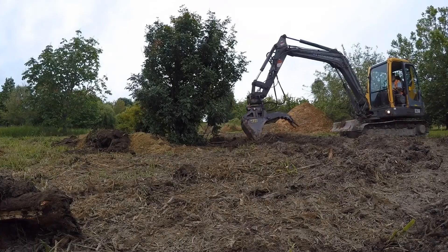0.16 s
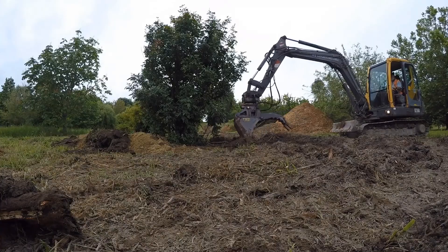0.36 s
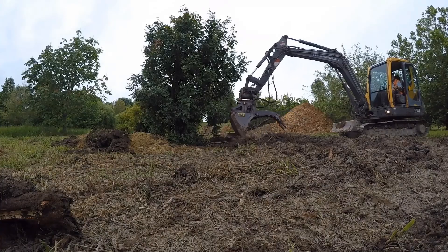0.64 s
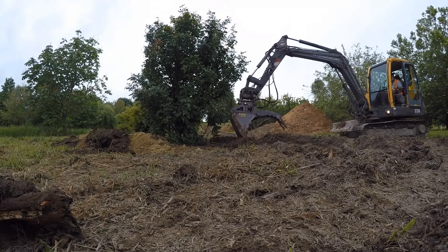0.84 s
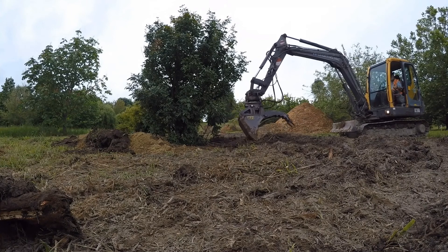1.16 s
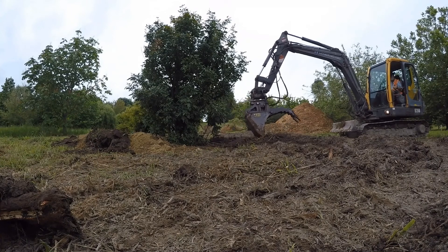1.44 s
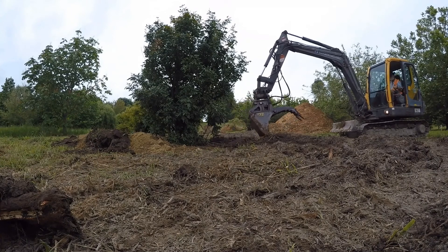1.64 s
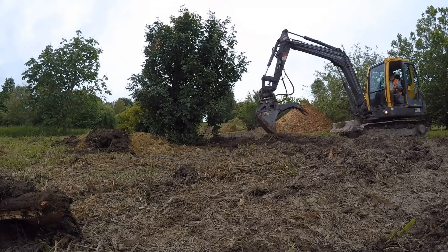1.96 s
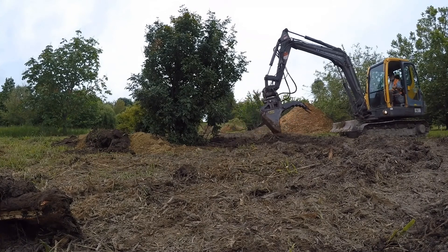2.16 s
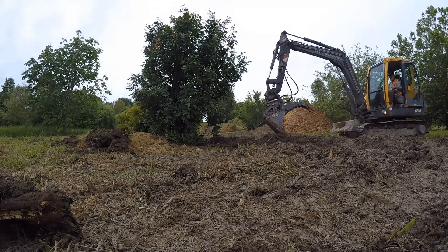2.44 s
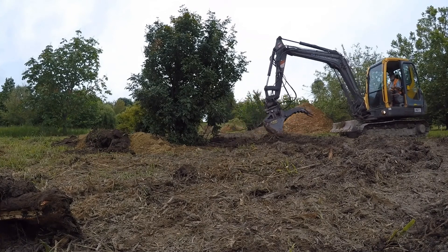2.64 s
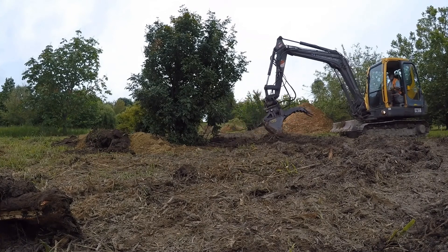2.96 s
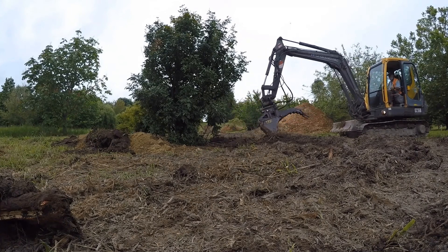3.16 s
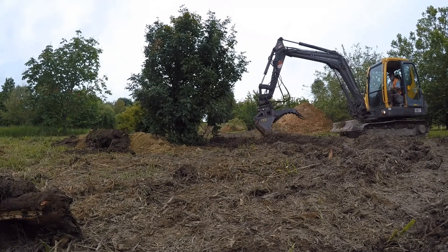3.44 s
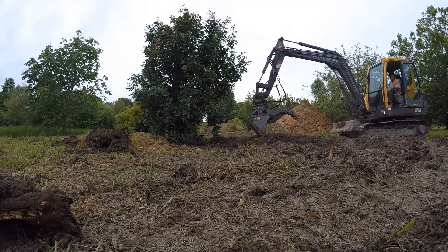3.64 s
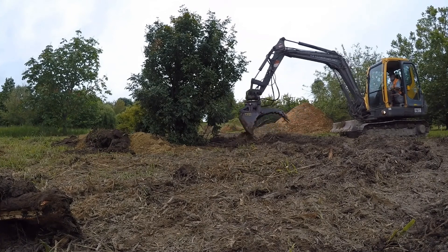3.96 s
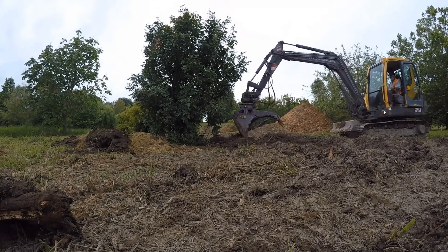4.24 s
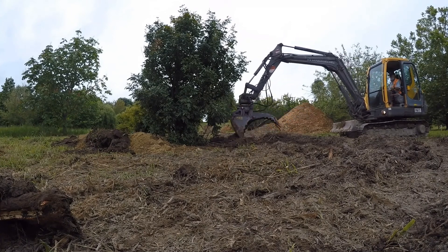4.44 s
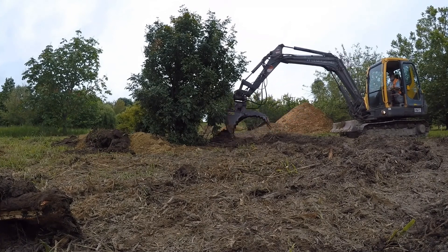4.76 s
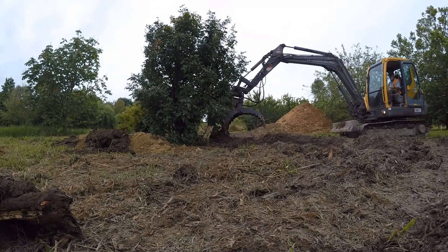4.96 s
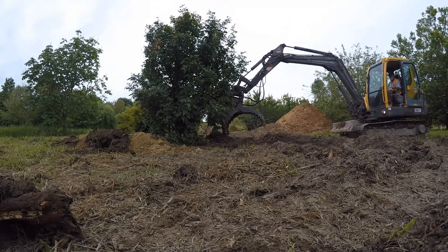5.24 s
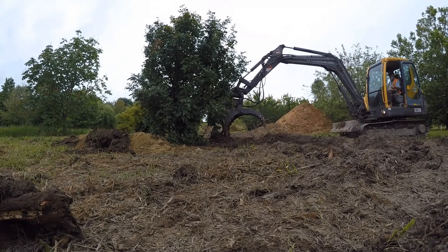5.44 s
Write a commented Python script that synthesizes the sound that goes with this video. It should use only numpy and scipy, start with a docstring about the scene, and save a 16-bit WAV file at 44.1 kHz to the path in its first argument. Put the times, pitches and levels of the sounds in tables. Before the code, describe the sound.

Low, booming four-cylinder diesel clatter surges slightly under load outdoors, while an excavator's bucket and linkage thud and clank a few times.

```python
"""The four-cylinder diesel of a small digger booms in a field, off to the right: sine waves at multiples of
its firing rate, with short rings for the knocks and noise that throbs with the firings for the clatter.
A low wavering sine hums and beats against the boom. One strong engine knock, then the thuds of the bucket
and the clanks of its linkage, are struck metal that rings briefly. Noise makes the rumble, the treble hiss
and a very short rough opening; sines make thin lines of pump and gears and a faint, fast-pulsing whine."""
import sys
import numpy as np
from scipy import signal
from scipy.fft import rfft, irfft, next_fast_len
from scipy.io import wavfile
from scipy.ndimage import uniform_filter1d

SR = 44100
rng = np.random.default_rng(int(sys.argv[2]) if len(sys.argv) > 2 else 0)


def wrap_up_sound(samples):
    """Save the sound to the file named by the first command line argument, as 16-bit audio."""
    columns = np.atleast_2d(samples).T
    # keep every value between -1 and 1, then stretch to whole-number steps
    tamed = np.clip(columns, -1, 1)
    steps = np.round(tamed * 32767).astype(np.int16)
    wavfile.write(sys.argv[1], SR, steps)


N = 246519   # length in samples
# frequencies in Hz at which filters are described; the tiny shift avoids log(0)
HZ = np.fft.rfftfreq(next_fast_len(N + 8192, real=True) // 2 * 2, 1 / SR) + 1e-3

# How the two channels hear a distant source. Each row: frequency in Hz, left minus right in dB,
# likeness of the two channels (0 to 1).
CHANNELS = [(157, -0.8, 0.52), (236, -3.5, 0), (407, 0.5, 0.62), (523, -2.5, 0.95), (730, -7.5, 0.95),
            (1337, 3, 0.96), (1596, 9, 0.76), (2490, -6, 0.86), (3060, 0.5, 0.7), (4900, -7.5, 0.58),
            (6500, 0, 0), (10100, -3.5, 0.17), (11700, -0.5, 0.13), (14300, 0, 0)]
# Phase between the channels. Each row: frequency in Hz, how far the left leads in radians.
LEFT_LEAD = [(0, 0), (260, -0.3), (860, -3.7), (1290, -3.5), (2150, -5.2), (2670, -7.3), (3010, -7.8),
             (3270, -5.1), (3790, -3.8), (4310, -4.7), (5000, -2.5), (5680, -2.4), (8610, -6.1),
             (14500, -5.7)]
# Turning of the cab. Each row: time in seconds, share of the turn (0 to 1).
SWING = [(0, 0), (2.3, 0.5), (3.0, 0.6), (3.3, 1), (4.8, 1), (5.59, 0.6)]

# Tone colour of the rough opening. Each row: frequency in Hz, relative level in dB per Hz.
OPENING_COLOUR = [(59, -17), (100, 14), (179, -10), (468, -31), (670, -21), (855, -45), (2030, -33),
                  (2550, -42), (9000, -58), (11700, -83), (19800, -120)]
# Tone colour of the rumble. Each row: frequency in Hz, relative level in dB per Hz.
RUMBLE_COLOUR = [(15, -5), (30, 17), (65, 11.5), (80, -63), (115, 5.5), (170, 5), (260, -7), (400, -17),
                 (900, -80)]
# Low wavering hum. Each row: time in seconds, frequency in Hz, level in dB.
HUM = [(0.05, 38.58, -37.5), (0.3, 40.93, -32.5), (0.42, 34.41, -42.0), (0.55, 44.19, -25.5),
       (0.8, 38.36, -40.0), (1.05, 41.94, -19.5), (1.17, 44.87, -33.0), (1.3, 38.17, -29.0),
       (1.42, 38.75, -53.5), (2.05, 41.15, -45.5), (2.67, 39.2, -41.5), (3.3, 39.01, -28.0),
       (3.42, 41.94, -32.0), (3.55, 38.02, -27.5), (4.05, 41.93, -40.0), (5.55, 36.55, -43.0)]
# Thin lines of pump and gears. Each row: frequency in quarters of the firing rate,
# level in dB before the left-right offset, delay in firings.
GEAR_LINES = [(30, -70, 0), (40, -73, 0), (46, -66.5, .62), (50, -68, .62), (60, -67.5, .45),
              (68, -74, .45), (76, -71, .45)]

# Hollow thuds of the bucket; the first, at 1.409 s, is a strong engine knock. Each row: time in seconds,
# base level in dB of the body rings, of the rim rings.
THUDS = [(1.409, -34.5, -45), (2.443, -39, -40), (2.775, -43, -54), (2.925, -34, -43), (3.042, -55, -34),
         (3.05, -26, -33), (3.062, -42, -30), (3.092, -27, -55), (3.118, -30, -46), (3.127, -47, -32),
         (4.224, -52, -38.5), (5.2705, -32, -30.5), (5.2767, -25.5, -61), (5.297, -43, -33)]
# Rings of the bucket body. Each row: frequency in Hz, relative level in dB, time to fall 60 dB in seconds.
BUCKET = [(215, -9, .04), (287, -2, .09), (312, -4, .07), (335, -6, .06)]
# Rings of the bucket rim. Each row: frequency in Hz, relative level in dB, time to fall 60 dB in seconds.
RIM = [(360, -3, .06), (390, -1, .06), (440, -3, .05), (485, -10, .04), (770, -14, .03)]
# Clanks in the bucket linkage. Each row: time in seconds, base level in dB of the link, of the pin,
# of the plate, of the bright tick.
CLANKS = [(0.955, -45.5, -45, -60, -69), (1.864, -56, -37.5, -60, -63), (2.4599, -39, -58, -49, -41),
          (2.465, -40.5, -56, -46, -56), (3.0349, -34.5, -43, -48, -53), (3.0452, -43, -37, -43, -36.5),
          (3.0572, -34, -43, -39, -62), (3.0645, -40, -54, -50, -62), (3.076, -38, -41, -52, -69),
          (3.109, -40, -50, -59, -66), (3.128, -34, -46, -33, -53), (3.1372, -33, -46, -37, -44),
          (3.151, -41, -48, -52, -60), (3.17, -46, -54, -44, -60), (5.269, -35.5, -49, -58, -69),
          (5.278, -46, -52, -58, -63), (5.2971, -29.5, -45, -34, -52), (5.304, -40, -50, -49, -51),
          (5.312, -46, -50, -49, -58), (5.329, -44, -57, -55, -62), (5.346, -42, -43.5, -52, -66)]
# Rings of the link. Each row: frequency in Hz, relative level in dB, time to fall 60 dB in seconds.
LINK = [(2270, -6., .02), (2390, -4., .024), (2510, -5., .026), (2640, -8., .02)]
# Rings of the pin. Each row: frequency in Hz, relative level in dB, time to fall 60 dB in seconds.
PIN = [(1600, 0, 0.022), (1690, -2, 0.022), (1850, -5, 0.02), (2080, -6, 0.02)]
# Rings of the plate. Each row: frequency in Hz, relative level in dB, time to fall 60 dB in seconds.
PLATE = [(2870, -5., .02), (3120, -3., .016), (3350, -7., .016)]
# Rings of the bright tick. Each row: frequency in Hz, relative level in dB, time to fall 60 dB in seconds.
TICK = [(4300, -4., .008), (4850, 1., .01), (5500, -3., .008), (6100, -2., .009), (6600, -3., .008)]

# Tone colour of the clatter. Each row: frequency in Hz, relative level in dB per Hz.
CLATTER_COLOUR = [(160, -66.5), (250, -72.5), (400, -83.5), (600, -80.5), (900, -79.5), (1200, -79),
                  (1600, -86), (2500, -87), (3300, -94), (4600, -96.5), (6000, -97.5), (9000, -99),
                  (11000, -104), (14000, -113)]
# Resonances of engine block and hood. Each row: frequency in Hz, width in Hz, lift in dB.
BLOCK = [(733, 160, 4), (890, 120, 4), (1480, 26, 8), (1688, 56, 8), (1860, 47, 6.5), (2030, 54, 6.5),
         (2350, 80, 3.5), (2440, 49, -1.5), (2570, 57, 8), (4720, 160, 7)]
# Strength of the low clatter bursts, one value in dB for each of the four cylinders in turn.
CYLINDERS_DB = np.array([-6, 7, 1, 0])
# What each ignition sets ringing. Each row: frequency in Hz, time to fall 60 dB in seconds, delay in firings,
# gain in dB at full swing, then the base level in dB for each of the four cylinders.
IGNITION = [(710, .025, .44, -4, -62, -45, -53, -54), (830, .022, .44, -5, -60, -41, -50, -51),
            (900, .022, .46, -5, -60, -43, -52, -53), (1670, .03, .22, -6, -49, -50, -42, -46),
            (1860, .025, .42, 6, -53, -57, -56, -55), (2280, .02, .23, 1, -48, -46, -49, -46),
            (2600, .022, .24, -1, -47, -46, -45, -46), (2450, .018, .45, -3, -46, -47, -46, -49),
            (3020, .011, .27, 8, -49, -50, -59, -53)]
# Speed and boom of the engine. Each row: time in seconds, firings per second, then the level in dB
# of firing orders 1, 2, 3, 5 and 6.
ENGINE = [(0.05, 44.81, -23.5, -26.0, -38.0, -47.5, -56), (0.42, 45.81, -25.0, -25.5, -36.0, -53.0, -66),
          (0.8, 48.77, -28.0, -32.5, -39.5, -60.5, -62), (1.05, 46.02, -29.5, -27.5, -34.0, -59.5, -54),
          (1.3, 46.65, -25.0, -28.0, -34.5, -68.0, -55), (1.92, 46.83, -25.5, -31.0, -38.0, -57.0, -63),
          (2.3, 47.6, -28.0, -34.0, -49.5, -54.0, -55), (2.55, 48.6, -30.5, -41.5, -50.5, -56.0, -54),
          (2.8, 49.25, -35.5, -62.0, -43.5, -54.0, -62), (3.05, 46.66, -37.0, -43.0, -39.0, -50.0, -59),
          (3.42, 45.08, -30.0, -33.0, -36.5, -44.5, -58), (3.92, 45.84, -25.5, -31.0, -33.0, -56.5, -52),
          (4.3, 48.0, -27.5, -35.5, -35.0, -52.5, -58), (4.55, 45.35, -26.5, -29.5, -37.5, -53.0, -69),
          (4.92, 45.97, -24.5, -31.0, -45.0, -64.5, -54), (5.05, 47.5, -25.5, -34.0, -54.5, -59.5, -53),
          (5.3, 49.09, -30.5, -48.5, -43.5, -56.0, -56), (5.55, 47.69, -32.0, -41.0, -36.5, -54.5, -59)]
# Multiples of the firing rate, in the order of the level columns of ENGINE.
FIRING_ORDERS = [1, 2, 3, 5, 6]
# Weak lines at order 4 and between the orders, as cylinders differ a little. Each row: frequency in
# quarters of the firing rate, level in dB while order 2 is at -30 dB.
WEAK_LINES = [(2, -37), (5, -49), (6, -47), (10, -48.5), (16, -57)]

OPENING_DB, OPENING_S, OPENING_END_S = -15.5, .037, .003   # level, end time, length of the fade-out
WHINE_DB, WHINE_PER_S = -68.5, 59.94   # level before the left-right offset, pulses per second
WHINE_HZ, WHINE_SPREAD_HZ = 8560, 45   # middle pitch and its chance spread from pulse to pulse
MEAN_RATE = 46.8   # firings per second at which rumble and clatter have their base levels
RUMBLE_DB, RUMBLE_DB_PER_HZ = -45, 4   # the working machine rumbles more as the engine runs free
RUMBLE_APART_HZ, RUMBLE_APART_DB = 170, 4.5   # the part that differs between channels lies mostly above this
PUMP_HZ, PUMP_DB, PUMP_WAVER = 1780, -63.5, 1   # level at full swing, waver in radians
SCATTER_DB, THUD_SCATTER_DB = -3.5, -6   # echoes relative to the sound that feeds them
AIR_CUT_HZ = 11300   # distance dulls the clanks
CLATTER_DB, CLATTER_DB_PER_HZ = -53.5, -.5   # clatter grows as load pulls the engine down
IGNITION_JITTER_S = .00025   # no two ignitions come quite on time
IGNITION_RISE = .3   # the pressure rise lasts this share of the ring
IGNITION_SPREAD_DB, IGNITION_COLOUR_DB = 1.2, 1.5   # chance in each firing, and in each of its rings
STOP_HZ = 14600   # from here up the treble is held at least 30 dB down


def from_db(db):
    """Turn decibels into a gain."""
    return 10 ** (np.asarray(db) / 20)


def rms_one(x):
    """Scale so that the average strength (rms) is 1."""
    return x / np.sqrt(np.mean(x ** 2))


def in_time(rows):
    """Join the rows of a time table by straight lines, one value per sample."""
    s, *columns = np.transpose(rows)
    return [np.interp(np.arange(N) / SR, s, c) for c in columns]


def over_hz(rows):
    """Join the rows of a frequency table by straight lines over log frequency."""
    hz, *columns = np.transpose(rows)
    return [np.interp(np.log(HZ), np.log(hz), c) for c in columns]


def shape(x, gain):
    """Filter by a gain for each frequency, padded so that the end does not wrap round."""
    size = 2 * (len(HZ) - 1)
    return irfft(rfft(x, size) * gain, size)[..., :N]


def drift(rate):
    """Slow chance around zero with spread 1; a higher rate in Hz wanders faster."""
    step = 64   # samples between drawn points
    size = N // step + 2
    hz = np.fft.rfftfreq(size, step / SR)
    slow = irfft(rfft(rng.standard_normal(size)) / (1 + (hz / rate) ** 2), size)
    return np.interp(np.arange(N) / step, np.arange(size), rms_one(slow))


def ring(clicks, hz, t60):
    """Like a tapped piece of metal, a click starts a sine that falls 60 dB in t60 seconds."""
    r = from_db(-60 / (t60 * SR))   # what is left after one sample
    w = 2 * np.pi * hz / SR
    return signal.lfilter([0, np.sin(w)], [1, -2 * r * np.cos(w), r * r], clicks + 1e-18)


def strike(s, levels_db, modes, contact_s, grit):
    """Blows make a body ring at its own pitches; each contact lasts a moment and may be gritty."""
    at = np.round(s * SR).astype(int)
    out, t = np.zeros(N), np.arange(800) / SR
    for hz, mode_db, t60 in modes:
        clicks = np.zeros(N)
        clicks[at] = from_db(levels_db + mode_db + 2.5 * rng.standard_normal(len(at)))
        rough = np.cos(2 * np.pi * hz * t) + grit * rng.standard_normal(len(t))
        contact = np.exp(-t / contact_s) * rough
        contact /= np.abs(np.sum(contact * np.exp(-2j * np.pi * hz * t)))   # gain 1 at this pitch
        out += ring(signal.fftconvolve(clicks, contact)[:N], hz, t60)
    return out


def bursts(firings, delay, decay, depth, uneven=0):
    """Each firing lifts the level at once, then it falls; chance varies the strength; depth is the floor."""
    late = firings - delay + 1
    number = late.astype(int)
    strength = from_db(1.2 * rng.standard_normal(int(firings[-1]) + 3))[number]
    strength = strength * from_db(uneven * np.take(CYLINDERS_DB, (number - 1) % 4))
    level = depth + strength * np.exp(-(late % 1) / decay)
    return rms_one(uniform_filter1d(level, size=60))


def two_channels(x):
    """A distant source reaches left and right with different level and phase at each frequency."""
    left_db = over_hz(CHANNELS)[0]
    lead = np.interp(HZ, *np.transpose(LEFT_LEAD))
    half = from_db(left_db / 2) * np.exp(.5j * lead)
    return shape(x, np.array([half, 1 / half]))


def scatter(x, db):
    """Trees and spoil heap send back short dense echoes, different in each channel."""
    t = np.arange(3000) / SR
    tail = rng.standard_normal((2, len(t))) * np.exp(-t / 0.0062) * (t > .003)
    tail /= np.sqrt(np.sum(tail ** 2, axis=1, keepdims=True))
    return from_db(db) * signal.fftconvolve(x[None], tail, axes=1)[:, :N]


def opening():
    """A very short stretch of rough, bass-heavy noise that stops quickly."""
    noise = rms_one(shape(rng.standard_normal(N), from_db(over_hz(OPENING_COLOUR)[0])))
    fade = np.clip((OPENING_S - np.arange(N) / SR) / OPENING_END_S, 0, 1)
    return from_db(OPENING_DB) * noise * fade


def whine():
    """Short high tone pulses, each with its own pitch, phase and strength."""
    t = np.arange(N) / SR
    beat = 2 * np.pi * WHINE_PER_S * t
    pulse = np.round(WHINE_PER_S * t).astype(int)
    every_other = np.cos(beat / 2)   # makes every second pulse early and slightly stronger
    gate = np.exp(1.75 * np.cos(beat - .15 + .2 * (1 - every_other)) - 0.11 * every_other)
    off, turn, strength = rng.standard_normal((pulse[-1] + 1, 3))[pulse].T
    tone = np.cos(2 * np.pi * (WHINE_HZ + WHINE_SPREAD_HZ * off) * t + 10 * turn)
    pulses = from_db(1.5 * strength) * tone * gate
    return from_db(WHINE_DB) * rms_one(pulses) * from_db([[-1.5], [1.5]])


def rumble(rate):
    """Hydraulics, fan and tracks make low lumpy noise, partly different in each channel."""
    near, *apart = shape(rng.standard_normal((3, N)), from_db(over_hz(RUMBLE_COLOUR)[0]))
    apart = shape(np.array(apart), 1 / (1 + (RUMBLE_APART_HZ / HZ) ** 1.5))
    both = two_channels(near) + from_db(RUMBLE_APART_DB) * apart
    level_db = RUMBLE_DB + RUMBLE_DB_PER_HZ * (rate - MEAN_RATE) + 3.5 * drift(1.0)
    return from_db(level_db) * rms_one(both)


def pump(swing):
    """A thin wavering sine that grows as the cab swings."""
    phase = 2 * np.pi * PUMP_HZ * np.arange(N) / SR + PUMP_WAVER * drift(4.2)
    return np.sqrt(2) * from_db(PUMP_DB) * swing ** 2 * np.cos(phase)


def gear_lines(firings):
    """Pump and gears turn with the engine: thin sines follow its speed, stronger on the right."""
    lines = np.zeros(N)
    for quarters, db, delay in GEAR_LINES:
        lines += from_db(db + 2.05 * drift(1.3)) * np.cos(quarters * np.pi / 2 * (firings - delay))
    return np.sqrt(2) * lines * from_db([[-4], [3]])


def knock_and_thuds():
    """One strong engine knock, then soft bucket blows, ring low; they reach the right louder and earlier."""
    s, *levels_db = np.transpose(THUDS)
    x = sum(strike(s, db, modes, contact_s=0.005, grit=.03)
            for modes, db in zip([BUCKET, RIM], levels_db))
    half = from_db(-2.0) * np.exp(-1j * np.pi * HZ * 0.000089)   # left 89 microseconds behind right
    return shape(x, np.array([half, 1 / half])) + scatter(x, THUD_SCATTER_DB)


def clanks():
    """Metal hits metal: link, pin, plate and a bright tick ring together."""
    s, *levels_db = np.transpose(CLANKS)
    x = sum(strike(s, db, modes, contact_s=0.0004, grit=.4)
            for modes, db in zip([LINK, PIN, PLATE, TICK], levels_db))
    return signal.sosfilt(signal.butter(2, AIR_CUT_HZ, fs=SR, output="sos"), x)


def hum():
    """A wavering sine beats against firing order 1; it starts in opposition to it."""
    hz, db = in_time(HUM)
    return -np.sqrt(2) * from_db(db) * np.cos(2 * np.pi * np.cumsum(hz) / SR)


def clatter(firings):
    """Combustion and valves make throbbing noise: a direct part, and a smoother scattered part."""
    colour = from_db(over_hz(CLATTER_COLOUR)[0])
    for hz, width, db in BLOCK:
        colour = colour * from_db(db / (1 + ((HZ - hz) / width * 2) ** 2))
    left_db, alike = over_hz(CHANNELS)
    alike = np.clip(alike, 0, 1)
    white = rng.standard_normal((4, N))

    low = 1 / (1 + (HZ / 1100) ** 6)   # the low part of each burst comes a little later
    direct_colour = colour * np.sqrt(alike)
    low_bursts = white[0] * bursts(firings, delay=0.483, decay=0.23, depth=0.78, uneven=1.0)
    high_bursts = white[1] * bursts(firings, delay=0.24, decay=0.45, depth=.2)
    direct = shape(low_bursts, low * direct_colour) + shape(high_bursts, (1 - low) * direct_colour)

    smooth = np.clip(HZ / 6000, 0, 1)   # toward the treble steady hiss takes over
    throb = bursts(firings, delay=0.27, decay=0.1, depth=1.0)
    scattered = shape(white[2:] * throb, 1 - smooth)
    scattered += shape(white[2:][::-1], np.sqrt(1 - (1 - smooth) ** 2))
    pan = from_db([left_db / 2, -left_db / 2])
    both = two_channels(direct) + shape(scattered, colour * pan * np.sqrt(1 - alike))

    band = (HZ > 1400) & (HZ < 3200)   # this band of the channel average is scaled to strength 1
    return both / np.std(shape(both.mean(axis=0), band))


def diesel_knock(firings, swing):
    """Each ignition raps the block, which rings briefly; every cylinder has its own colour."""
    out, force = np.zeros(N), rng.standard_normal(int(firings[-1]) + 2)
    for hz, t60, delay, swing_db, *cylinders_db in IGNITION:
        at = np.flatnonzero(np.diff(np.floor(firings - delay)))
        late, colour = rng.standard_normal((len(at), 2)).T
        # as the cab swings, another side of the hood faces the listener
        db = np.resize(cylinders_db, len(at)) + swing_db * swing[at]
        db = db + IGNITION_SPREAD_DB * force[:len(at)] + IGNITION_COLOUR_DB * colour
        clicks = np.zeros(N)
        shifted = at + (IGNITION_JITTER_S * SR * late).astype(int)
        clicks[np.clip(shifted, 0, N - 1)] = from_db(db - 2.0)
        # taking away a shorter ring softens the start
        out += ring(clicks, hz, t60) - ring(clicks, hz, IGNITION_RISE * t60)
    return out


def exhaust(firings, levels_db):
    """Firing puffs add up to sines at multiples of their rate, plus weak lines at order 4 and between orders."""
    out = np.zeros(N)
    for k, db in zip(FIRING_ORDERS, levels_db):
        turn = 1.2 * (k - 1) * (k - 2.5)   # the pipe shifts the phase of each order, in radians
        out += from_db(db + 0.15 * drift(16.0)) * np.cos(k * 2 * np.pi * firings + turn)
    load_db = levels_db[1] + 30.0   # the weak lines follow order 2
    for quarters, db in WEAK_LINES:
        phase = quarters * np.pi / 2 * firings + drift(0.33)
        out += from_db(db + load_db + 2.66 * drift(1.9)) * np.cos(phase)
    return np.sqrt(2) * out


def scene():
    """Add up the parts of the machine, the short opening and the faint whine in two channels."""
    rate, *levels_db = in_time(ENGINE)
    firings = np.cumsum(rate) / SR   # running count of firings
    swing = np.clip(in_time(SWING)[0], 0, 1)
    background = opening() + whine() + rumble(rate) + gear_lines(firings)
    metal = diesel_knock(firings, swing) + clanks()
    direct = two_channels(exhaust(firings, levels_db) + hum() + pump(swing) + metal)
    rattle = from_db(CLATTER_DB + CLATTER_DB_PER_HZ * (rate - MEAN_RATE)) * clatter(firings)
    return background + knock_and_thuds() + scatter(metal, SCATTER_DB) + rattle + direct


def record(dry):
    """Cut the highest treble with a steep filter."""
    return signal.sosfilt(signal.cheby2(10, 30, STOP_HZ, fs=SR, output="sos"), dry)


dry = scene()
out = record(dry)
wrap_up_sound(out)
```